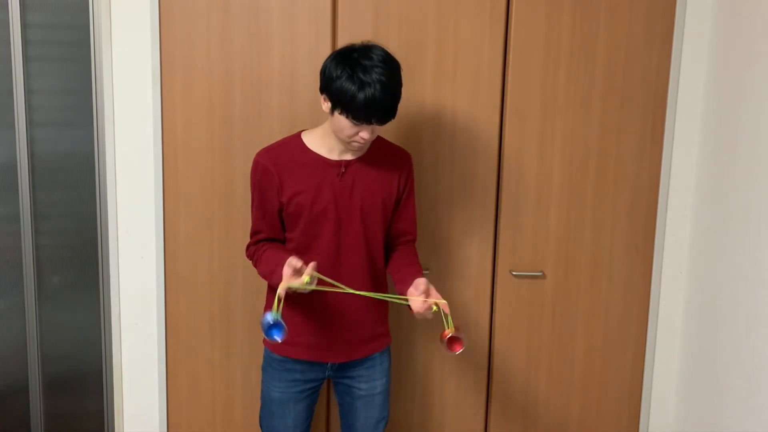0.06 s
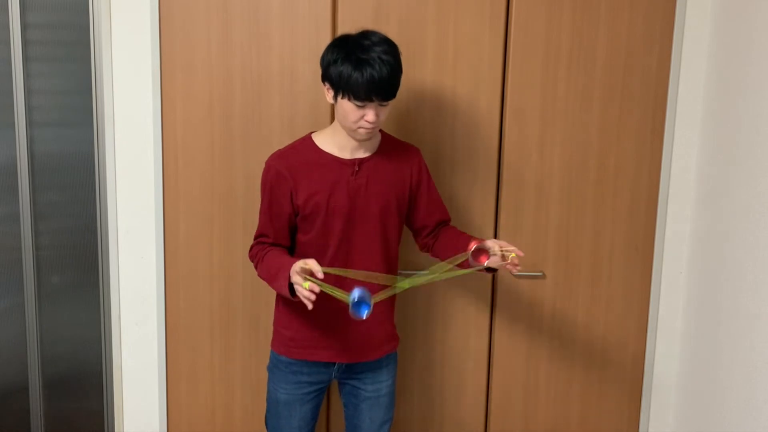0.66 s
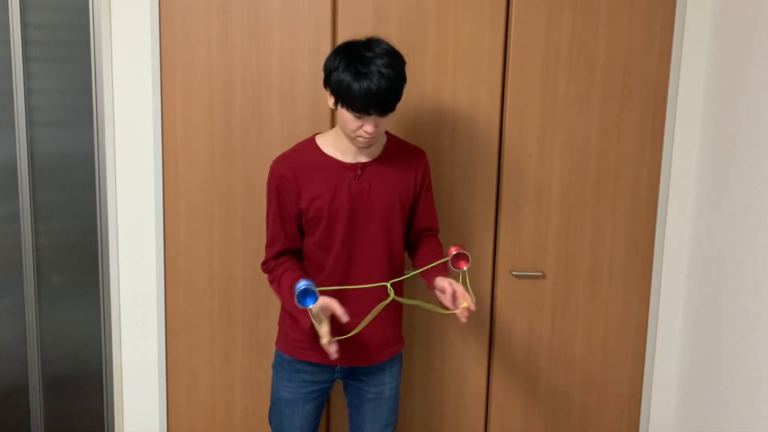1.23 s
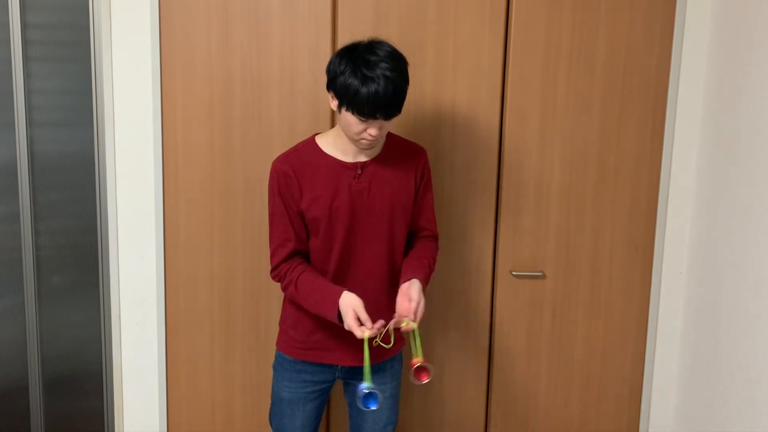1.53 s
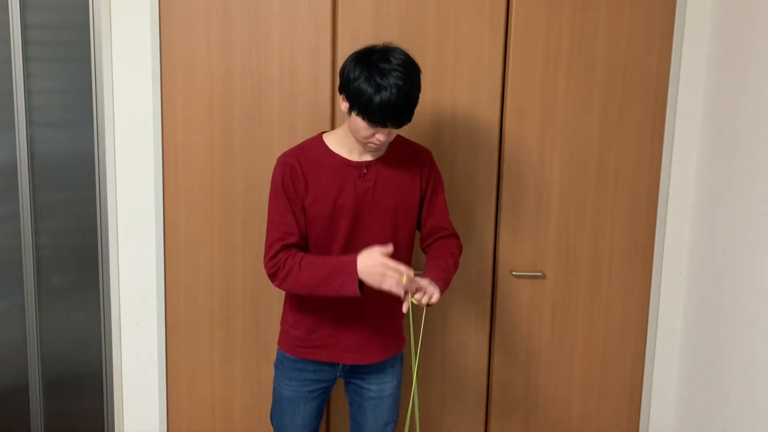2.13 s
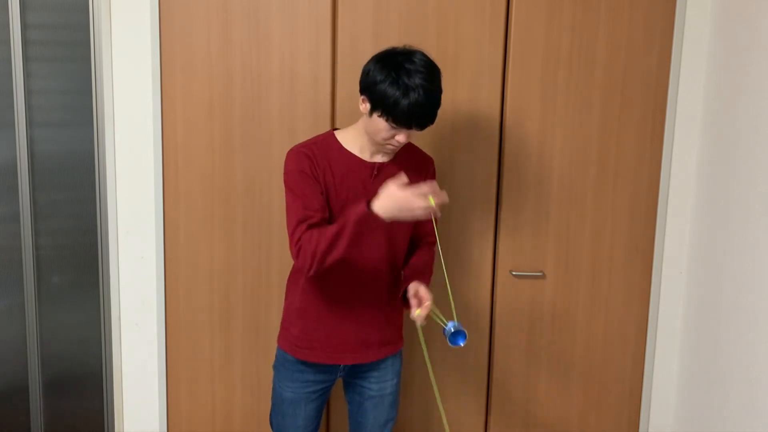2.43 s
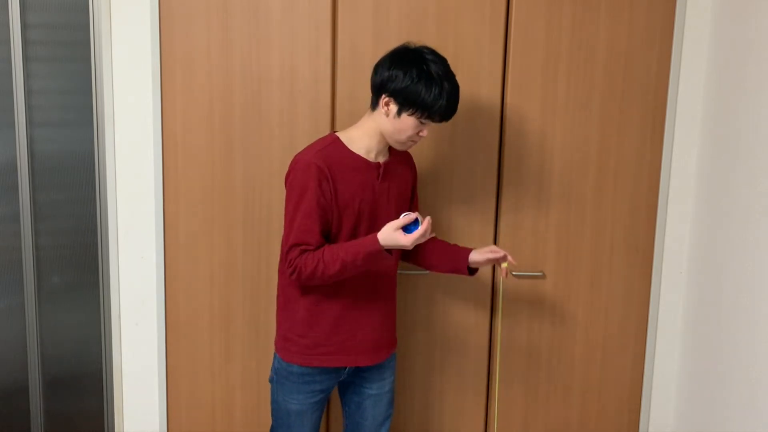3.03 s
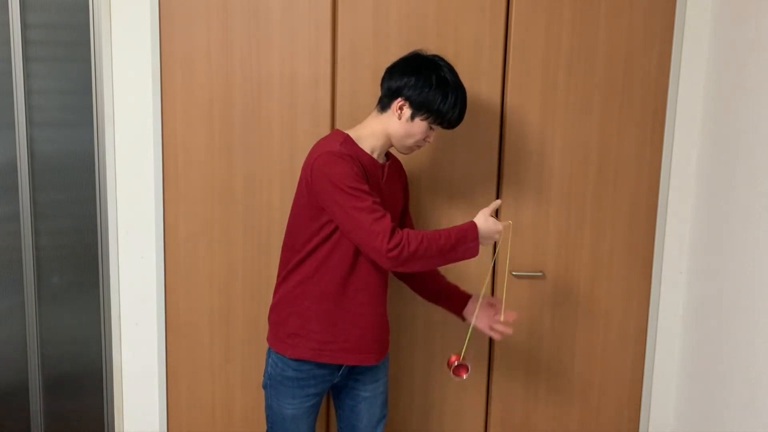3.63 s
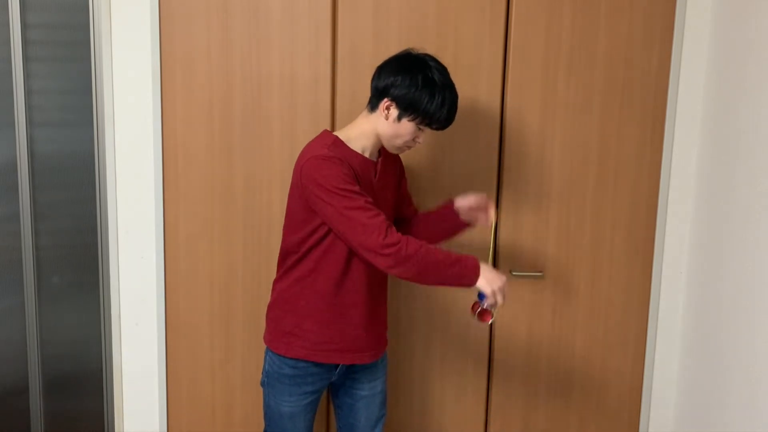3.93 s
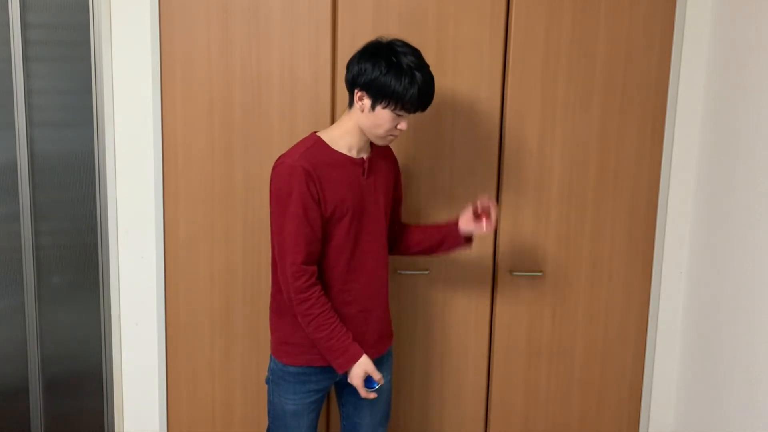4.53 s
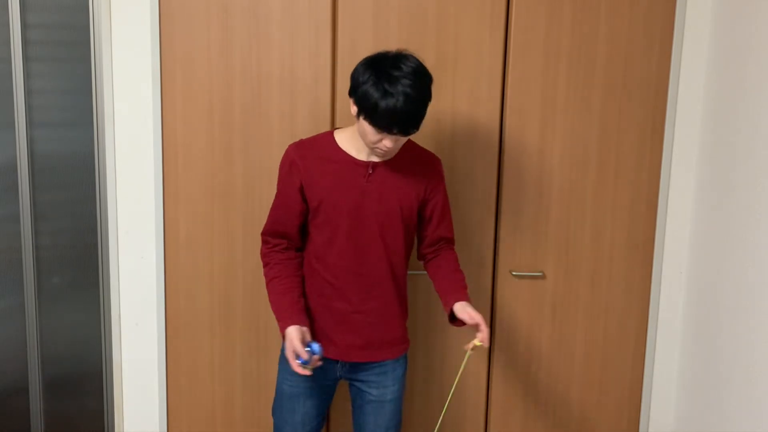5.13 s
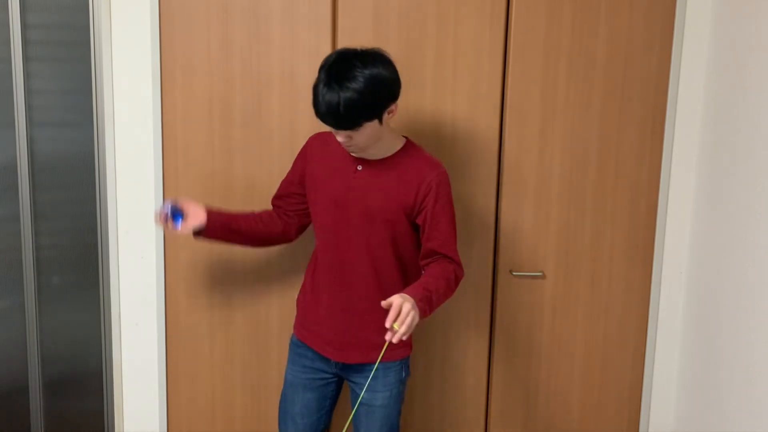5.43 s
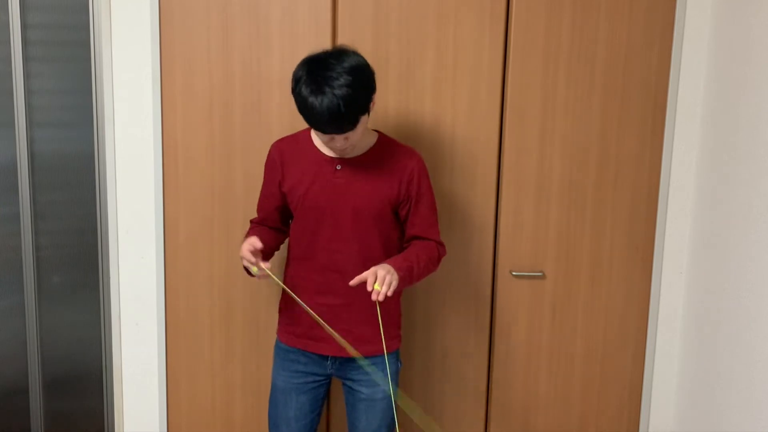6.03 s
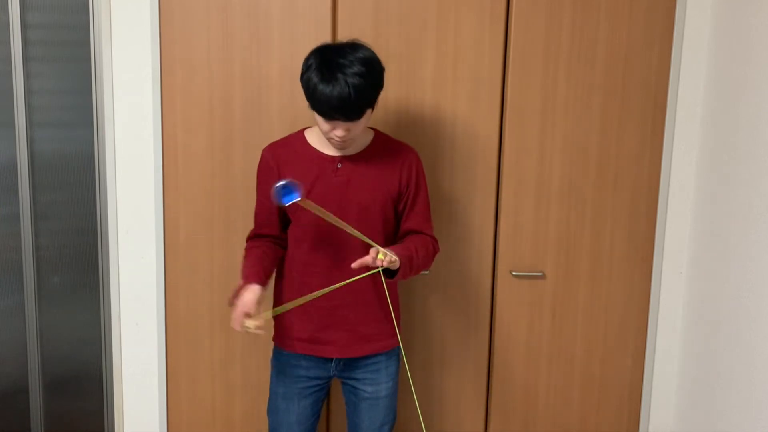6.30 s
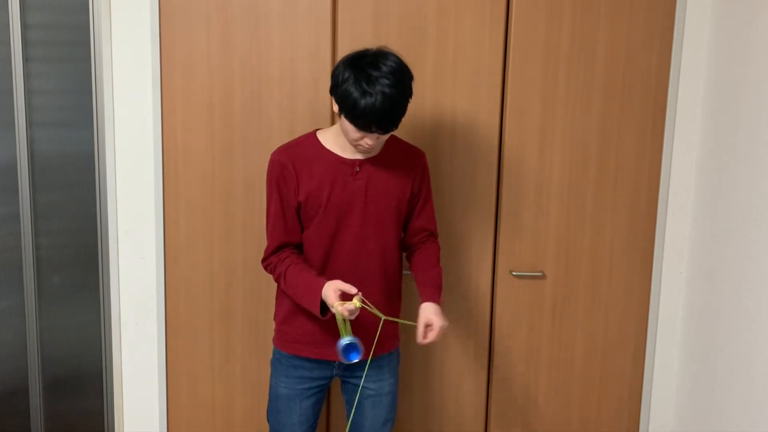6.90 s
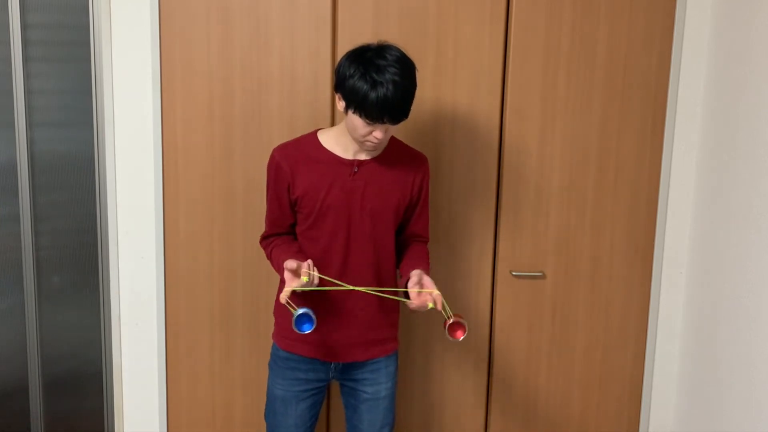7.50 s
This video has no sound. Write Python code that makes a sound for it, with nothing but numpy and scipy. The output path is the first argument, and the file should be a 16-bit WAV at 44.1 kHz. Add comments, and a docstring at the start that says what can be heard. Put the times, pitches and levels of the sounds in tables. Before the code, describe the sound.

Two metal yo-yos spin close by with a high bearing hiss, sharp whistling flares and the fine rub of their strings. Early on they clash once with a bright ring. Soft knocks follow as they are caught in turn, and the whirring stops briefly. Then they are thrown again with sharp clicks and the hiss returns. Sleeves rustle faintly over a low room rumble in a small hallway.

```python
"""A small hallway with wooden doors, heard in stereo close to two metal yo-yos spinning on their strings.
The ball bearings hiss, a sharp whistle flares, and the strings rub in the gaps. The yo-yos clash once
and ring, are caught one after the other, rest, and are thrown again. Sleeves rustle and the floor booms
softly. The doors answer the clash and the knocks from close by, over a faint room rumble."""
import sys
import numpy as np
from scipy import signal
from scipy.fft import rfft, irfft, next_fast_len
from scipy.io import wavfile
from scipy.ndimage import uniform_filter1d, map_coordinates

SR = 44100
rng = np.random.default_rng(int(sys.argv[2]) if len(sys.argv) > 2 else 0)


def to_wav(s):
    """Save 16-bit WAV."""
    ch = np.atleast_2d(s).T  # columns
    pcm = np.round(np.clip(ch, -1, 1) * 32767)  # PCM
    wavfile.write(sys.argv[1], SR, pcm.astype(np.int16))


N = 342216

# The bearings run down, stop when both yo-yos are caught, and start again.
# Each row: time in seconds, then rolling hiss, whistle and string fizz in dB.
SPIN = [(0, -53, -37.5, -62.5), (.8, -52.5, -38.5, -60.5), (1.5, -54.5, -40, -64.5), (1.9, -58, -44.5, -65),
        (2.65, -59.5, -44, -67.5), (2.84, -54.5, -49, -66.5), (3.2, -57, -41.5, -62.5),
        (3.58, -57.5, -40, -66.5), (3.76, -63.5, -47.5, -69), (4.0, -53, -46, -76), (4.16, -99, -87, -99),
        (4.68, -99, -100, -99), (4.88, -73, -60, -76), (4.95, -59.5, -48, -62.5), (5.13, -56.5, -46, -68),
        (5.75, -56.5, -40.5, -64.5), (6.2, -57, -38.5, -62), (7.76, -53.5, -37.5, -60.5)]
# One yo-yo hangs and winds down. Each row: start and length in seconds, final sag of its whirr in Hz.
HANGS = [(2.811, 1, 2100), (5.118, 0.87, 202)]
# Rim strikes rim. Each row: start in seconds, level of the crack in dB.
RIM_STRIKES = [(1.601, -25.5), (1.608, -35)]
# The main bell tones of the four slightly unequal halves. Each row: pitch in Hz, relative level in dB,
# t60 in seconds, phase lead on the left in radians, direction in which the clash pushes (+1 or -1).
BELL_TONES = [(2212, -9.5, .5, .6, 1), (2221, -3, .48, .5, 1), (2247, -3, .48, .4, -1),
              (2260, -8.5, .45, 1.15, -1)]
CRUISE_DB = -60  # rolling level that counts as an ordinary spin


def bearings():
    """Balls roll and chatter in their races; with them a sharp 9.5 kHz whistle flares at each landing."""
    # A yo-yo lands on its string. Each row: peak time in seconds, level of the flare in dB.
    landings = [(0.021, -33), (.345, -38), (.415, -30.5), (.6, -33), (.815, -33), (1.16, -41), (1.38, -43),
                (1.855, -37.5), (2.0, -39), (2.14, -40.5), (2.31, -32), (2.615, -50), (2.785, -33),
                (2.89, -38.5), (3.11, -36.5), (3.27, -46), (3.45, -31.5), (3.6, -42), (3.89, -44),
                (5.0, -35.5), (5.16, -39), (7.0, -46), (7.19, -39), (7.33, -32), (7.455, -33),
                (7.65, -32.5)]
    # Spectrum of the whistle. Each row: frequency in Hz, relative level in dB.
    whistle_tone = [(4000, -70), (6500, -44), (8000, -31), (8700, -22), (9150, -11), (9380, -3), (9480, 0),
                    (9600, -4), (9750, -12), (10100, -20), (10700, -31), (12000, -42), (13500, -70)]
    # The hiss, with a gap near 10-11 kHz from the recorder.
    # Each row: frequency in Hz, relative level in dB.
    hiss_tone = [(1500, -46.5), (3000, -19.5), (4200, -8), (5200, -3.5), (6300, 2.5), (7500, 2),
                 (8800, 8.5), (9400, 15), (10500, -58), (13000, -31.5)]
    spin_db, whistle_db, _ = curves(SPIN)
    chatter = wobble(120)
    whistle = unit(filtered(rng.standard_normal(N), lambda hz: amp(along(whistle_tone, hz))))
    flares = swells([(s, .043, db) for s, db in landings])
    clash_flare = amp(-21.5) * decay(RIM_STRIKES[0][0], t60=.092, attack=.001)
    whistle_level = np.hypot(amp(whistle_db - .34 * slack()), flares) + clash_flare
    whistle *= whistle_level * amp(.81 * chatter + .37 * wobble(29))
    # The whistle is nearly opposite in phase in left and right.
    whistle = filtered(whistle, lambda hz: np.exp(1j * 1.565 * np.array([[1], [-1]])))

    # Faster spin is brighter; while a yo-yo hangs, its hiss narrows to a whirr.
    whirr_hz = 6437 + 159.5 * (spin_db - CRUISE_DB) - whirr_sag()
    focus_db = 5 * sum(stroke(s, length) for s, length, _ in HANGS)
    hiss = swirl(rush(hiss_tone), whirr_hz, lift_db=5.5 + focus_db, patchy_db=3, width_hz=850)
    hiss *= amp(rolling() - 1.07 - .5 * focus_db + 1.4 * chatter)

    race_level = amp(spin_db - .5 * slack() - 19 + 1.8 * wobble(17))
    race_whine = np.hypot(race_level, amp(-35) * flares) * narrow(centre_hz=4546, width_hz=48)
    return hiss + race_whine + whistle


def slack():
    """The dip in dB as a yo-yo hops: its string goes slack and the unloaded bearing quietens."""
    # Each row: middle of the hop and half length in seconds, dip in dB.
    hops = [(0.257, 0.042, 11), (0.548, 0.025, 2.5), (0.672, 0.031, 7.5), (1.28, 0.06, 14),
            (1.778, 0.022, 7), (2.2, 0.031, 3.5), (2.689, 0.03, 10), (3.824, 0.041, 12.5),
            (3.971, 0.047, 18), (5.063, 0.021, 5.5), (6.457, 0.13, 2), (6.736, 0.052, 5.5),
            (7.388, 0.026, 4.5)]
    t = np.arange(N) / SR
    return sum(dip_db * np.exp(-((t - s) / half_length) ** 4) for s, half_length, dip_db in hops)


def rolling():
    """Level of the rolling balls in dB: spin, less the slack of the string."""
    return curves(SPIN)[0] - slack()


def whirr_sag():
    """How many Hz the whirr of a hanging yo-yo has dropped; it falls fastest near the end."""
    t = np.arange(N) / SR
    return sum(sag_hz * stroke(s, length) * np.clip((t - s) / length, 0, 1) ** 4
               for s, length, sag_hz in HANGS)


def strings():
    """The string slides in the gap: a rough rub and a fine fizz, both flickering with the fibres."""
    # Each row: start and length in seconds, rub and fizz in dB, centre of the rub in Hz.
    slides = [(0, .16, -61.5, -52.5, 1760), (0.216, 0.085, -67, -56.5, 2330),
              (0.313, 0.11, -61, -54.5, 1938), (0.451, .05, -81, -59.5, 2436), (0.6, 0.12, -70, -69, 2550),
              (0.706, .14, -63, -57, 2340), (0.877, 0.27, -64.5, -62, 2180), (1.112, 0.098, -63, -61, 2400),
              (1.362, 0.068, -62.5, -60.5, 2170), (1.445, 0.087, -66, -67.5, 2282),
              (1.802, 0.054, -51.5, -50.5, 2227), (1.976, .06, -64.5, -57, 2232),
              (2.098, 0.11, -65.5, -61, 2516), (2.278, 0.084, -59.5, -49.5, 2240),
              (2.359, 0.1, -65, -59.5, 2253), (2.735, .09, -65, -62.5, 2480),
              (2.856, 0.356, -74, -74, 2303), (3.4, 0.05, -64, -49, 2553), (3.442, 0.059, -64, -65, 2594),
              (4.706, 0.12, -65.5, -72, 2100), (4.966, 0.039, -64, -58.5, 2537),
              (5.925, 0.23, -63.5, -62.5, 2405), (6.114, 0.14, -60.5, -56, 2400),
              (6.246, 0.09, -62.5, -60, 2460), (6.326, 0.14, -63, -57, 2815), (6.449, 0.14, -61, -54, 3000),
              (6.559, 0.094, -59, -57, 2440), (6.772, 0.13, -64, -58.5, 2322), (6.946, 0.1, -63, -59, 2870),
              (7.138, .12, -58, -55, 2310), (7.266, .15, -63, -55, 2586), (7.434, .32, -63.5, -55, 2524)]
    # Spectra of the rub and the fizz. Each row: frequency in Hz, relative level in dB.
    rub_tone = [(150, -25), (400, -31), (800, -13.5), (1100, -13), (1600, -7), (2300, -6), (2900, -2.5),
                (3700, -9), (5000, -4), (9000, -44)]
    fizz_tone = [(7000, -31), (10800, -25), (12100, 5), (13400, 1.5), (14200, 5.5), (15500, 0.5),
                 (15900, 0.5)]
    fibres = wobble(160)
    # A little of both carries on between the slides.
    rub_power = amp(rolling() - 21) ** 2
    fizz_power = amp(curves(SPIN)[2] - .3 * slack()) ** 2
    for s, length, rub_db, fizz_db, _ in slides:
        envelope = stroke(s, length)
        rub_power += (amp(rub_db) * envelope) ** 2
        fizz_power += (amp(fizz_db) * envelope) ** 2
    rub_hz, = curves([(s + length / 2, hz) for s, length, _, _, hz in slides])
    rub = amp(-3 + 2 * fibres) * swirl(rush(rub_tone), rub_hz, lift_db=9, patchy_db=3.3, width_hz=620)
    fizz = amp(2 + 1.3 * fibres) * rush(fizz_tone)
    return amp(.79 * wobble(25)) * (np.sqrt(rub_power) * rub + np.sqrt(fizz_power) * fizz)


def clash():
    """The rims strike: a hard crack and a clang, then nearly equal bell tones that beat together."""
    # Other, shorter tones of the metal. Each row: pitch in Hz, relative level in dB, t60 in seconds,
    # phase lead on the left in radians.
    short_tones = [(1949, -21, .16, .3), (2530, -16, .09, .3), (2666, -21, .18, .3), (2824, -19, .27, .5),
                   (3268, -18, .11, .4), (3537, -17, .12, .5), (3784, -14, .16, .5), (4735, -15, .17, .6),
                   (4926, -20, .18, .6), (5186, -18, .16, .7), (5259, -15, .1, .7), (5450, -13, .15, .8),
                   (5644, -19, .15, .7), (5862, -22, .15, .7), (6944, -17, .1, .5), (7097, -13, .12, .5),
                   (7224, -6, .155, .5), (7440, -17, .15, .5), (7559, -11, .125, .6), (12130, -20, .11, .1),
                   (12400, -20, .11, .1), (12850, -18, .1, .1), (13035, -12, .1, .1), (13430, -14, .11, .1),
                   (15673, -5, .075, 1.15)]
    # A bright crack, with a recorder notch near 14 kHz. Each row: frequency in Hz, relative level in dB.
    crack_tone = [(200, -53), (700, -14), (1100, -19), (1700, -4.5), (3000, -6.5), (3700, 2.5),
                  (4400, -10.5), (5400, 7), (6200, -15.5), (7400, 8.5), (8400, -15), (11800, -21),
                  (13200, 3.5), (14200, -16), (15600, -2.5)]
    out = np.zeros((2, N))
    start = RIM_STRIKES[0][0]
    for hz, db, t60, lead, push in BELL_TONES:
        bell = mode(hz, t60, rise=.03, lead=lead, scatter=.55, blur_hz=18)
        add(out, start, push * amp(db - 12.5) * bell)
    for hz, db, t60, lead in short_tones:
        add(out, start, amp(db - 20) * mode(hz, t60, rise=.003, lead=lead, scatter=.8, blur_hz=80))
    clang = amp(-27) * decay(start, t60=.25, attack=.004) * narrow(centre_hz=2214, width_hz=76)
    for s, crack_db in RIM_STRIKES:
        out += amp(crack_db) * decay(s, t60=.14, attack=.0004) * rush(crack_tone)
    return out + clang


def knocks():
    """A yo-yo slaps a palm or jerks its string: a soft thud, a hollow knock, a clack and a bright tick."""
    # Catches, throws and jerks. Each row: start in seconds, then thud, clack, tick and hollow in dB,
    # then t60 and rise in seconds.
    blows = [(1.801, -55.5, -66.5, -50, -59, .16, 0.0024), (1.822, -63, -61, -56.5, -64, .14, 0.0022),
             (2.956, -59, -50.5, -65, -44.5, 0.049, 0.0017), (2.971, -60.5, -58.5, -78, -51, 0.13, 0.00085),
             (3.865, -92, -71.5, -51.5, -82, 0.28, .002), (4.015, -62, -66.5, -66.5, -58, 0.31, 0.003),
             (4.130, -50.5, -51.5, -55, -52.5, .13, 0.0011), (4.158, -52, -62.5, -89, -49, 0.1, .002),
             (4.694, -77, -60.5, -84, -79, 0.08, .0007), (4.972, -58.5, -58, -39.5, -66, .2, 0.0036),
             (5.826, -69, -53, -32, -47, 0.082, 0.0017), (5.835, -51, -54.5, -41.5, -60, 0.11, .001),
             (5.861, -75, -54, -60, -67, .069, 0.0011)]
    # The hollow of a half against the palm. Each row: pitch in Hz, relative level in dB, t60 in seconds.
    hollow_tones = [(560, -10, 0.065), (694, -4.5, 0.033), (758, 2.5, 0.041), (845, -9, 0.031),
                    (1174, -5, 0.052), (2240, -3.5, 0.097), (2387, -3, .08), (2510, -6, .07),
                    (2620, 1, 0.054), (2830, -3, 0.052)]
    # Spectra of the thud, clack and tick. Each row: frequency in Hz, relative level in dB.
    thud_tone = [(40, -20), (100, 1), (250, -6), (450, -2.5), (700, -3), (1100, -11), (1800, -29),
                 (5000, -41)]
    clack_tone = [(400, -9), (1200, -6.5), (1900, -3), (2300, -0.5), (2800, -3.5), (3600, -3),
                  (5000, -12.5), (9000, -20)]
    tick_tone = [(2000, -16.5), (4500, -14.5), (7500, -17.5), (9400, -0.5), (11000, -8.5), (13500, -3),
                 (15800, -3)]
    thud, clack, tick = np.zeros((3, N))
    hollow = np.zeros((2, N))
    for s, thud_db, clack_db, tick_db, hollow_db, t60, rise in blows:
        thud += amp(thud_db + 1.5) * decay(s, t60, attack=.0085)
        clack += amp(clack_db) * decay(s, t60, rise)
        tick += amp(tick_db) * decay(s, t60, attack=.0037)
        grip = 1 + .025 * rng.standard_normal()  # every grip tunes the hollow a little differently
        for hz, db, ring_t60 in hollow_tones:
            tone = mode(hz * grip, ring_t60, rise, lead=.27, scatter=.62, blur_hz=150)
            add(hollow, s, amp(hollow_db + db) * tone)
    grain = amp(.5 + .71 * wobble(330))
    return hollow + grain * (thud * rush(thud_tone) + clack * rush(clack_tone) + tick * rush(tick_tone))


def snatch():
    """The string runs out on the throw and bites the axle with a short squeak."""
    peak_s, half_length_s, db = 5.8315, .004, -38
    return swells([(peak_s, half_length_s, db)]) * narrow(centre_hz=2780, width_hz=230)


def rims():
    """The rims ring faintly from the rolling balls, and with their bell tones after each light touch."""
    # Each row: start in seconds, strength of the touch in dB, t60 and rise in seconds.
    touches = [(1.165, -59, 0.31, 0.018), (1.985, -56, 0.42, 0.0076), (2.745, -59, 0.6, 0.016),
               (3.91, -65.5, 0.64, 0.033), (3.96, -52, 0.31, 0.017), (4.15, -45.5, 0.1, 0.01),
               (4.175, -44.5, 0.061, 0.0028), (4.212, -53, 0.076, 0.0037), (4.365, -77, 0.22, .015),
               (4.73, -67, 0.69, 0.015), (4.79, -63, 0.36, 0.0059), (4.945, -59, 0.2, 0.007),
               (5.675, -63.5, 1, 0.016), (6.57, -62.5, 0.69, 0.016)]
    out = amp(rolling() - 24.5 + 4.5 * wobble(18)) * narrow(centre_hz=2228, width_hz=34)
    for s, touch_db, t60, rise in touches:
        for hz, db, _, lead, _ in BELL_TONES:
            add(out, s, amp(touch_db + db + 3.5) * mode(hz, t60, rise, lead, scatter=.68, blur_hz=73))
    return out


def hums():
    """A taut string makes a yo-yo hum: low tones start with a tug, waver and fade."""
    # Each row: start in seconds, pitch in Hz, relative level in dB, t60 and rise in seconds.
    tugs = [(1.62, 772, -63, .8, .018), (1.62, 850, -63, .5, .016), (1.803, 805, -52, .34, .003),
            (1.805, 699, -63, .55, .014), (3.35, 796, -67, .6, .07), (4.974, 803, -61, .52, .008),
            (4.974, 685, -62, .62, .025), (5.83, 869, -61.5, .62, .01), (5.83, 761, -68, .55, .01),
            (6.58, 863, -68, .35, .04)]
    out = np.zeros((2, N))
    for s, hz, db, t60, rise in tugs:
        add(out, s, amp(db + 7.5) * mode(hz, t60, rise, lead=.22, scatter=1, blur_hz=85))
    return out


def sleeves():
    """Cloth brushes on cloth as the arms swing; its colour glides from one swish to the next."""
    # Each row: peak time and half length in seconds, level in dB, centre in Hz.
    swishes = [(1.165, 0.047, -76, 300), (4.035, .06, -73, 700), (4.728, .025, -71, 1250),
               (4.778, 0.057, -71.5, 650), (4.835, 0.063, -66.5, 220), (5.68, .02, -62.5, 500),
               (5.718, .025, -63, 280), (5.795, 0.062, -66.5, 130), (5.874, 0.051, -61.5, 250),
               (7.053, 0.069, -74.5, 250)]
    # Spectrum of the cloth. Each row: frequency in Hz, relative level in dB.
    cloth_tone = [(30, -30), (80, -2), (200, -4.5), (400, -7.5), (900, -12), (2300, -17), (5000, -17),
                  (15000, -33)]
    centre_hz, = curves([(s, hz) for s, _, _, hz in swishes])
    grain = amp(1.5 * wobble(89))
    cloth = swirl(rush(cloth_tone), centre_hz, lift_db=6, patchy_db=2, width_hz=360)
    return swells([row[:3] for row in swishes]) * grain * cloth


def steps():
    """The floor gives a dull boom under the feet as the weight shifts."""
    # Each row: peak time and half length in seconds, level in dB.
    booms = [(1.76, 0.049, -64), (1.85, 0.052, -66.5), (4.86, 0.038, -62.5), (5.02, 0.054, -67),
             (5.78, 0.045, -68), (5.87, 0.2, -69.5)]
    # Spectrum of the floor. Each row: frequency in Hz, relative level in dB.
    floor_tone = [(20, -16.5), (55, -1), (100, -4), (200, -20), (500, -53.5)]
    return swells(booms) * rush(floor_tone)


def hallway(x):
    """The nearby doors and walls answer after 6 ms, each frequency dying at its own speed."""
    # Each row: frequency in Hz, t60 in seconds.
    decay_times = [(100, 0.25), (800, 0.15), (2500, 0.28), (8000, 0.064), (15000, 0.136)]
    hz, t, spectrum = signal.stft(rng.standard_normal((2, SR // 2)), SR, nperseg=256)
    fade = amp(-60 * t / along(decay_times, hz)[:, None])
    tail = signal.istft(spectrum * fade, SR, nperseg=256)[1]
    tail = np.pad(tail / np.linalg.norm(tail[0]), ((0, 0), (round(.006 * SR), 0)))
    return signal.fftconvolve(x, tail, axes=1)[:, :N]


def room_tone():
    """Still indoor air, with a low rumble that grows a little during the play."""
    # Room air, with a gap near 10-11 kHz from the recorder, and the rumble.
    # Each row: frequency in Hz, relative level in dB.
    air_tone = [(20, -22), (60, 7), (130, -6), (480, -13), (800, -24.5), (1300, -20.5), (2200, -22.5),
                (3000, -26), (7000, -27.5), (10000, -45.5), (13000, -19.5), (15500, -40)]
    rumble_tone = [(20, -14), (40, -5), (55, 0), (80, -4.5), (130, -13), (300, -25.5), (900, -25),
                   (3000, -68.5)]
    spin_db = curves(SPIN)[0]
    rumble = amp(-77.5 + .14 * (spin_db - CRUISE_DB) + .8 * wobble(25)) * rush(rumble_tone)
    return amp(-76) * rush(air_tone) + rumble


def mode(hz, t60, rise, lead, scatter, blur_hz):
    """One dying tone: its direct part, plus wall scatter that drifts on each side as the yo-yo moves."""
    t = np.arange(int(SR * min(1, 2 * t60))) / SR
    knots = rng.standard_normal((2, 256)) + 1j * rng.standard_normal((2, 256))
    drift = np.array([np.interp(t * blur_hz, np.arange(len(k)), k) for k in knots])
    direct = np.exp(1j * lead * np.array([[1], [-1]]))
    phasor = (direct + scatter * drift) / np.sqrt(1 + 2 * scatter ** 2)
    envelope = amp(-60 * t / t60) * (1 - np.exp(-t / rise))
    return envelope * np.imag(phasor * np.exp(2j * np.pi * hz * t))


def rush(tone):
    """Stereo noise with the given spectrum and a mid signal of rms 1, nearly centred in the bass."""
    # Stereo width at the microphone. Each row: frequency in Hz, side over mid in dB.
    width = [(60, -12), (200, -10.5), (400, -5), (800, 0), (2400, -0.5), (7000, -3.5), (8300, -6),
             (9500, -1), (11000, -9.5), (13200, -15.5), (15500, 2)]
    mid, side = filtered(rng.standard_normal((2, N)),
                         lambda hz: amp(along(tone, hz)) * [np.ones_like(hz), amp(along(width, hz))])
    return np.array([mid + side, mid - side]) / mid.std()


def narrow(centre_hz, width_hz):
    """Stereo noise in one resonance."""
    noise = rng.standard_normal((2, N))
    return unit(filtered(noise, lambda hz: 1 / (1 + ((hz - centre_hz) / width_hz) ** 2)))


def swirl(x, centre_hz, lift_db, patchy_db, width_hz):
    """Movement shifts the colour of a noise: drifting patches and one gliding, lifted band."""
    hz, t, spectrum = signal.stft(x, SR, nperseg=512)
    patches = uniform_filter1d(rng.standard_normal(spectrum.shape[1:]), size=5, axis=0)
    patches = uniform_filter1d(patches, size=10, axis=1)
    centre, lift = [np.interp(t, np.arange(N) / SR, c + np.zeros(N)) for c in (centre_hz, lift_db)]
    band = np.exp(-((hz[:, None] - centre) / width_hz) ** 2)
    coloured = signal.istft(spectrum * amp(patchy_db * unit(patches) + lift * band), nperseg=512)[1]
    return unit(coloured[:, :N]) * x.std()


def decay(s, t60, attack):
    """Envelope of a blow at time s."""
    envelope, start = np.zeros(N), round(s * SR)
    t = np.arange(min(SR, N - start)) / SR
    envelope[start:start + len(t)] = amp(-60 * t / t60) * (1 - np.exp(-t / attack))
    return envelope


def stroke(s, length, rise_s=.024, fall_s=.016):
    """Soft rise, hold and release from time s."""
    t = np.arange(N) / SR - s
    return (.5 + .5 * np.tanh(t / rise_s)) * (.5 - .5 * np.tanh((t - length) / fall_s))


def swells(rows):
    """Smooth bumps of level. Each row: peak time and half length in seconds, level in dB."""
    t = np.arange(N) / SR
    return sum(amp(db) * np.exp(-((t - s) / half_length) ** 2) for s, half_length, db in rows)


def wobble(rate):
    """A smooth random curve, rate knots a second."""
    knots = rng.standard_normal(int(N * rate / SR) + 4)
    return map_coordinates(knots, [np.arange(N) * rate / SR], order=2)


def curves(rows):
    """One value per sample for each column after the time."""
    times, *columns = np.transpose(rows)
    return [np.interp(np.arange(N) / SR, times, column) for column in columns]


def along(points, hz):
    """Interpolate (Hz, value) points on a log frequency axis."""
    frequencies, values = np.transpose(points)
    return np.interp(np.log(hz + 1), np.log(frequencies), values)


def filtered(x, response):
    """Pass x through a response given as a function of Hz."""
    size = next_fast_len(N + 8192)
    return irfft(rfft(x, size) * response(np.fft.rfftfreq(size, 1 / SR)), size)[..., :N]


def add(out, s, x):
    """Mix a short stereo sound in at time s."""
    rest = out[:, round(s * SR):]
    rest[:, :x.shape[1]] += x[:, :rest.shape[1]]


def amp(db):
    """Decibels to amplitude."""
    return 10 ** (np.asarray(db) / 20)


def unit(x):
    """Scale to rms 1."""
    return x / np.sqrt(np.mean(x ** 2) + 1e-20)


def scene():
    """The whole mix; the clash, knocks and squeak also echo in the hallway."""
    metal = clash()
    hands = knocks() + snatch()
    echo = hallway(amp(-10.5) * metal + amp(-8) * hands)
    yo_yos = bearings() + strings() + rims() + metal + hands + hums()
    return yo_yos + echo + sleeves() + steps() + room_tone()


def record(dry):
    """The recorder keeps nothing above its band limit."""
    top_hz = 15830
    return filtered(dry, lambda hz: hz < top_hz)


dry = scene()
out = record(dry)
to_wav(out)
```